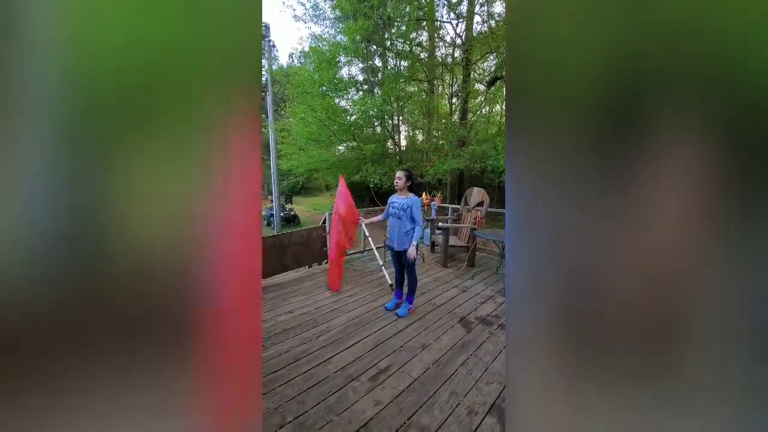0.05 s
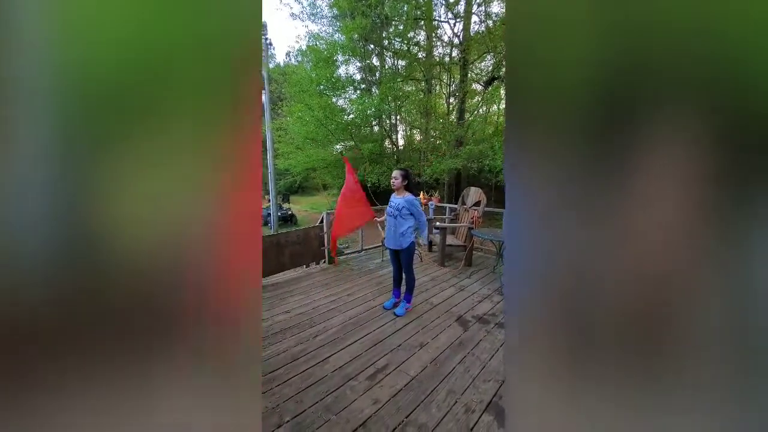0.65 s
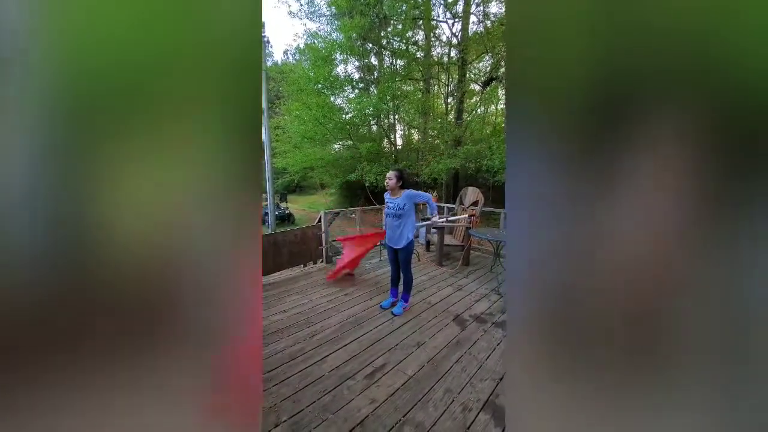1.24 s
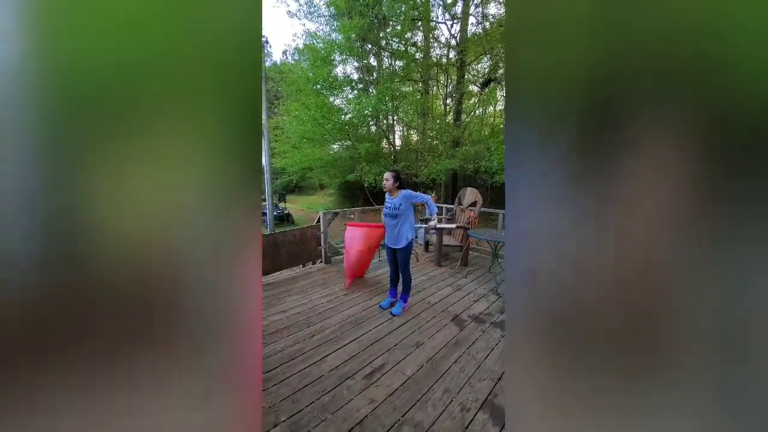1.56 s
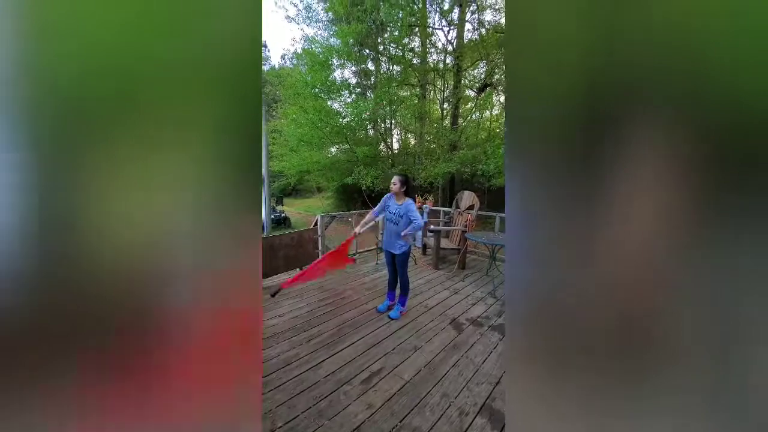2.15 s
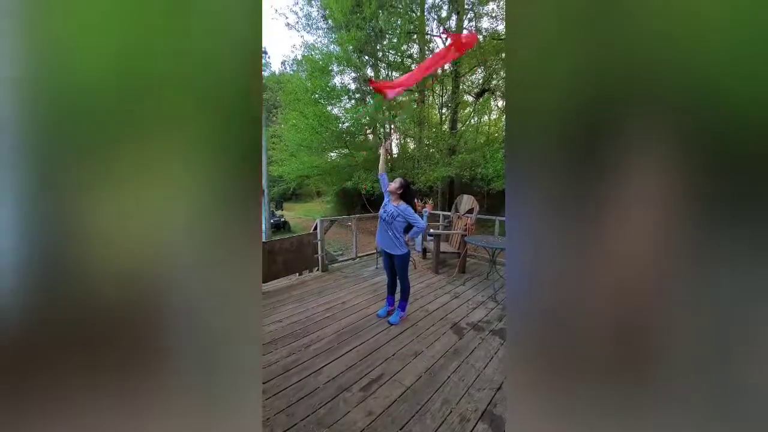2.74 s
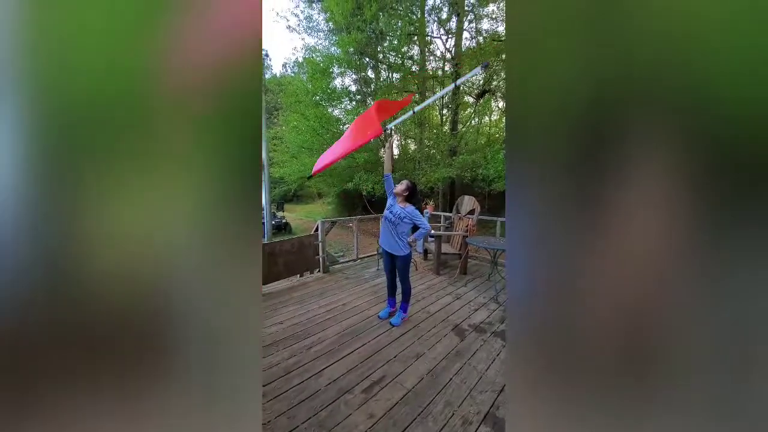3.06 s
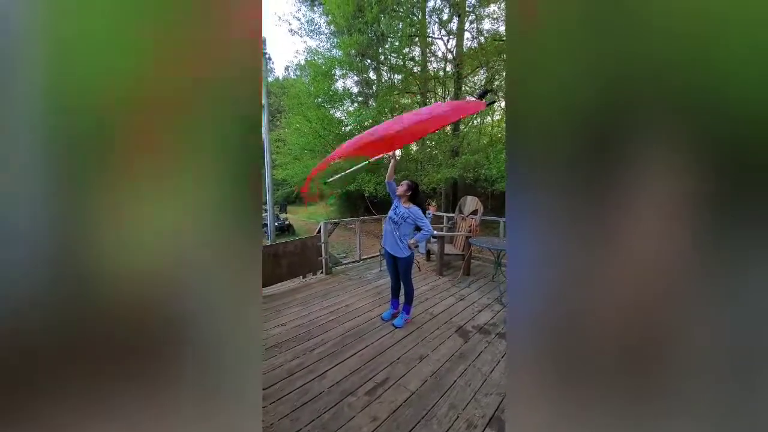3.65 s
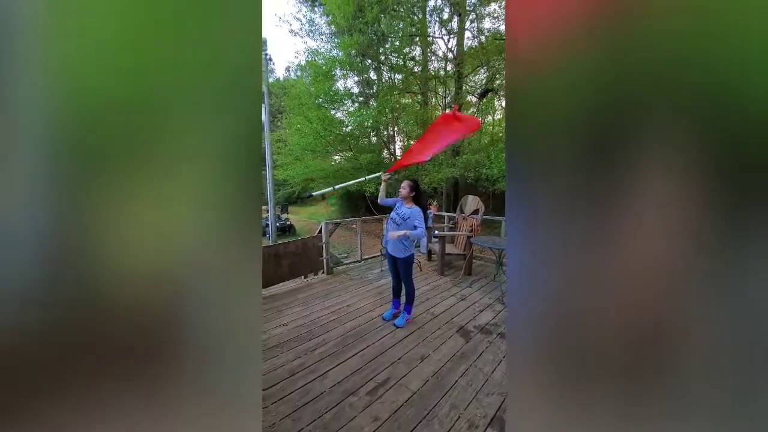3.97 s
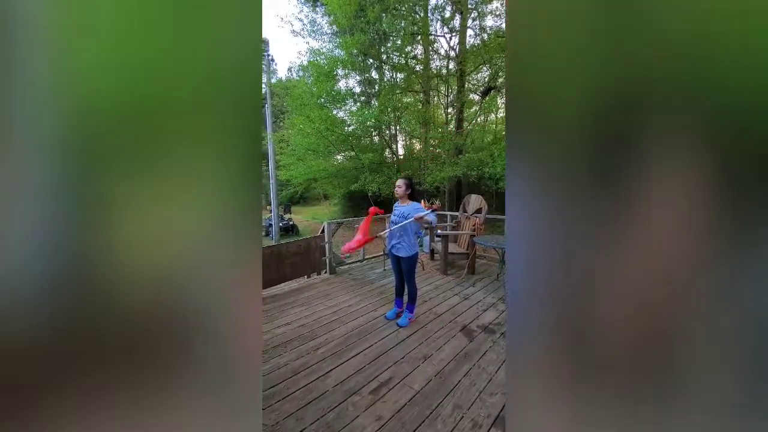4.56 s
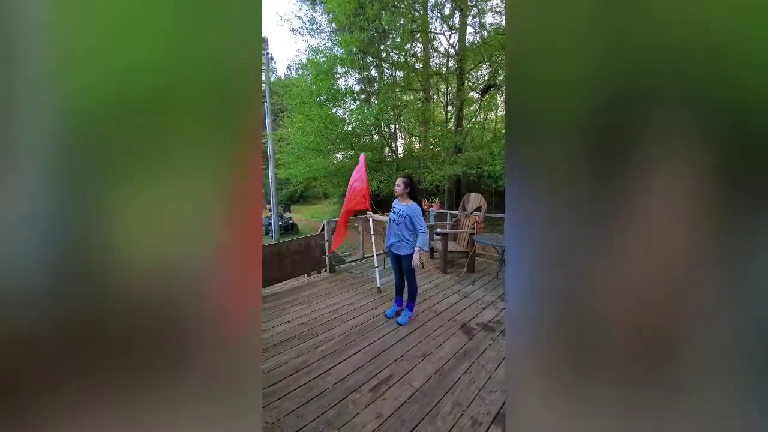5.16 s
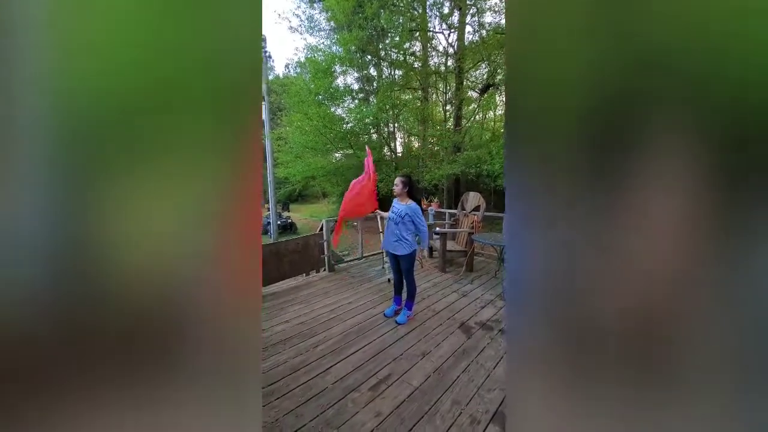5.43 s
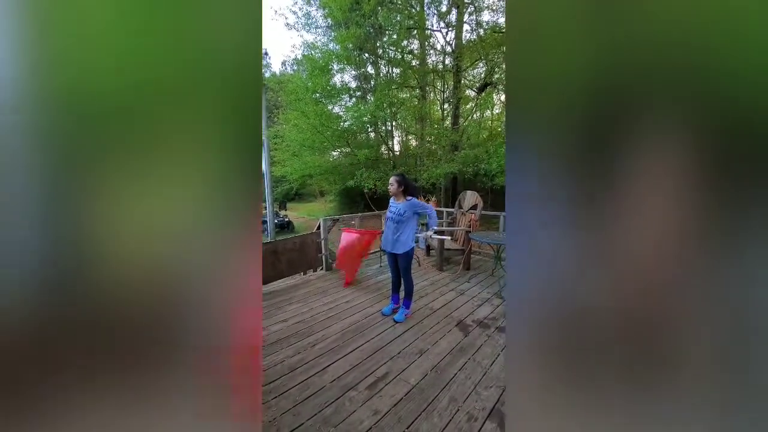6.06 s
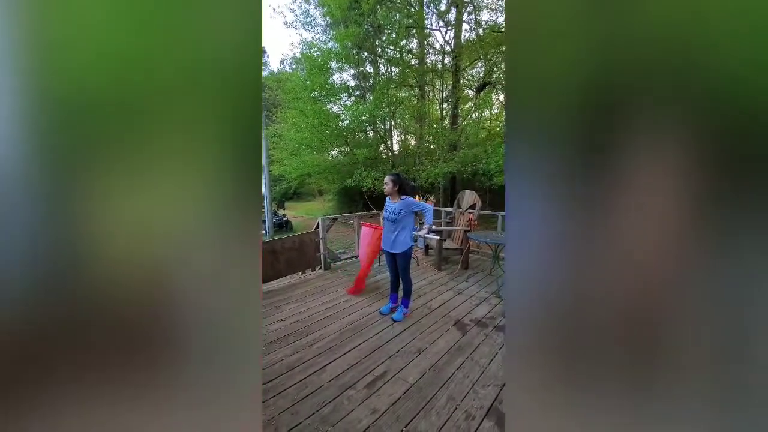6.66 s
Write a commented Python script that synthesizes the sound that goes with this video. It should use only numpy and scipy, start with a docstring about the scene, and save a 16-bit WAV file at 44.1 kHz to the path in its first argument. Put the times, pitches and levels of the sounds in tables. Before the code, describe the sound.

A flag pole clacks into catching hands, twice sharply, over distant traffic rumble, chirping birds and soft cloth swishes.

```python
"""A flag is spun, tossed and caught on a wooden deck at the edge of a wood.
From the start, far traffic rumbles and slowly moves off while leaves hiss faintly.
A songbird whistles a rising note, the cloth swishes, the pole clacks in the hands, and a thin,
very high whistle follows. After two seconds the cloth flaps twice. Then comes a run of falling
chirps, thrown back by the trees, with the two loudest catches near 4.3 and 5.9 seconds."""
import sys
import numpy as np
from scipy import signal
from scipy.fft import irfft
from scipy.io import wavfile
from scipy.ndimage import uniform_filter1d

SR = 44100
rng = np.random.default_rng(int(sys.argv[2]) if len(sys.argv) > 2 else 0)


def wrap_up_sound(samples):
    """Save the sound to the file named by the first command line argument, as 16-bit audio."""
    columns = np.atleast_2d(samples).T
    # keep every value between -1 and 1, then stretch to whole-number steps
    tamed = np.clip(columns, -1, 1)
    steps = np.round(tamed * 32767).astype(np.int16)
    wavfile.write(sys.argv[1], SR, steps)


N = 299880
TIME = np.arange(N) / SR


def amp(db):
    """Turns decibels into a number to multiply a sound by."""
    return 10 ** (np.asarray(db) / 20)


def unit(x):
    """Scales a signal so that its average size (rms) is 1."""
    return x / np.sqrt(np.mean(x ** 2) + 1e-20)


def read(points, hz):
    """Reads between the rows of a table, giving every octave equal room."""
    f, value = np.transpose(points)
    return np.interp(np.log(hz + 1), np.log(f + 1), value)


def add(mix, s, sound):
    """Mixes a sound in, starting at s seconds."""
    part = mix[..., max(round(s * SR), 0):][..., :sound.shape[-1]]
    part += sound[..., :part.shape[-1]]


def drift(n, size):
    """A smooth random wobble; a larger size makes it slower."""
    return unit(uniform_filter1d(uniform_filter1d(rng.standard_normal(n), size), size))


def causal(db, size=2048):
    """The shortest click that has the given spectrum, with energy 1."""
    log_gain = np.log(amp(np.r_[db, db[-2:0:-1]]))
    taps = irfft(np.exp(np.conj(signal.hilbert(log_gain)))[:size // 2 + 1])
    return taps / np.linalg.norm(taps)


def diffuse(spectrum):
    """Noise from all around: left and right are alike in the bass, unrelated in the treble."""
    # how alike the two sides are: f/Hz, likeness (1 = the same)
    likeness = [(60, 1), (130, 0.99), (290, 0.96), (640, 0.68), (1410, -0.055), (3100, -0.072),
                (6820, -0.023), (15000, -0.074)]
    # how much louder the left side is: f/Hz, level/dB
    balance = [(60, -0.4), (110, -1.0), (200, -0.5), (380, -2), (700, -2), (1290, 0.5), (2380, -4),
               (4400, 1.5), (8120, -1.5), (15000, -0.5)]
    hz = np.fft.rfftfreq(N, 1 / SR)
    left, other = np.exp(2j * np.pi * rng.random((2, len(hz))))
    same = np.clip(read(likeness, hz), -1, 1)
    right = same * left + np.sqrt(1 - same ** 2) * other
    level_db = read(spectrum, hz) + np.outer([.5, -.5], read(balance, hz))
    noise = irfft(np.array([left, right]) * amp(level_db), N)
    return noise / np.std(noise.mean(0))


def receding(start_db, fall_db, fade_s):
    """Volume of a sound that moves off: it falls fastest at first, then settles."""
    return amp(start_db - fall_db * (1 - np.exp(-TIME / fade_s)))


def traffic(drone_db=1.5, steadiness=0.19, dulling=0.94, sizzle_hz=3800, wander_db=0.46):
    """Engines throb and drone under the roar of tyres on a far road."""
    # tone of the deep rumble, the drone and the tyre roar: f/Hz, level/dB
    rumble_tone = [(15, -30), (30, -16), (42, -13), (50, -9), (55, -1.5), (64, 0), (73, 1.5), (86, 2),
                   (104, -9.5), (117, -10), (137, -16.5), (175, -17.5), (260, -29.5), (500, -81)]
    drone_tone = [(100, -6), (180, -12.5), (235, 1), (290, -4.5), (370, -3), (490, -2.5), (620, -14),
                  (1000, -44)]
    roar_tone = [(150, -27), (400, -8.5), (620, -4), (740, 0.5), (1050, 0.5), (1400, -0.5), (1850, -2.5),
                 (2900, -7.5), (3800, -17.5), (5000, -23.5), (6600, -24.5), (8000, -35.5), (16000, -46.5)]
    # how each fades with distance: starting level/dB, final drop/dB, fade time/s
    rumble_fade = (-30.5, 8.25, 1.9)
    drone_fade = (-44.5, 37.6, 14.4)
    roar_fade = (-40.5, 5.24, 4.28)
    engines = diffuse(rumble_tone)
    swell = uniform_filter1d(engines.mean(0) ** 2, size=5000)
    engines = engines / swell ** (steadiness / 2)  # engines run more evenly than plain noise
    tyres, nearness = diffuse(roar_tone), receding(*roar_fade)
    sizzle = signal.sosfiltfilt(signal.butter(2, sizzle_hz, "high", fs=SR, output="sos"), tyres)
    tyres = tyres + sizzle * (unit(nearness) ** dulling - 1)  # treble fades faster with distance
    drone = amp(drone_db) * receding(*drone_fade) * diffuse(drone_tone)
    waver = amp(wander_db * drift(N, size=5000))  # moving air makes far sound waver
    return receding(*rumble_fade) * engines + (drone + nearness * tyres) * waver


def leaves(level_db=-73):
    """Leaves give a faint, steady hiss."""
    # tone of the hiss: f/Hz, level/dB
    hiss_tone = [(2500, -23), (4000, -13), (6500, -7), (8200, -7), (10300, -4), (11900, -14.5),
                 (14400, -6.5), (15800, -13.5)]
    return amp(level_db) * diffuse(hiss_tone)


def rising_note(start, length, db, first_hz, last_hz, bend=1.2):
    """Path (t/s, f/Hz, level/dB) of a note that swells quickly and fades as it climbs."""
    progress = np.linspace(0, 1, 41)
    hz = last_hz + (first_hz - last_hz) * (1 - progress) ** bend  # the climb eases off
    swell_db = np.interp(progress, [0, 0.3, 1], [-3.5, 0, -12.5])
    return np.c_[start + length * progress, hz, db + swell_db]


def arched_note(start, length, db, top_hz, pitch_drop=.11, ends_db=-14):
    """Path (t/s, f/Hz, level/dB) of a note that rises and falls, loudest at the top."""
    progress = np.linspace(0, 1, 41)
    sag = (2 * progress - 1) ** 2
    return np.c_[start + length * progress, top_hz * (1 - pitch_drop * sag), db + ends_db * sag]


def whistle(path, waver, overtone_db=-24, beak_hz=3970, beak_width_hz=170):
    """Start time and sound of a gliding, wavering tone; faint overtones escape near one pitch."""
    s, hz, db = np.transpose(path)
    t = np.arange(s[0], s[-1], 1 / SR)
    pitch = np.interp(t, s, hz) * (1 + waver * drift(len(t), size=200))
    angle = 2 * np.pi * np.cumsum(pitch) / SR
    leak = amp(overtone_db) * np.exp(-((pitch - beak_hz) / beak_width_hz) ** 2)
    tone = np.sin(angle) + leak * (np.sin(2 * angle) + np.sin(3 * angle))
    return s[0], amp(np.interp(t, s, db)) * tone * signal.windows.tukey(len(t), .1)


def birds(direct_db=-4, near_db=-4, echo_db=0.5, chirp_db=-3, thin_db=-5, pan_db=-1, flutter_db=3):
    """Whistled calls come from the trees, both directly and as strong echoes."""
    # rising notes: t/s, length/s, level/dB, first f/Hz, last f/Hz
    rising_notes = [(0.152, 0.21, -50, 3280, 4460), (2.335, .29, -48, 3370, 4400),
                    (2.603, .17, -61, 4820, 5050), (5.923, .22, -46, 3477, 4740)]
    # thin, very high notes: t/s, length/s, level/dB, top f/Hz
    thin_notes = [(.42, 0.28, -64, 11250), (4.88, 0.32, -65, 10800), (5.2, .46, -70, 11700),
                  (6.45, 0.23, -69, 10400)]
    # falling chirps: t/s, level/dB, top f/Hz
    chirp_notes = [(3.584, -54, 4130), (3.907, -51.5, 4000), (4.212, -51, 3900), (4.499, -51.5, 3940),
                   (4.773, -49.5, 3920), (5.044, -47, 3825), (5.313, -49.5, 3860), (5.585, -48, 3850),
                   (6.124, -49, 3850), (6.406, -49.5, 3880)]
    # path of one chirp: t/s, share of the top pitch, level/dB
    chirp_shape = [(-.012, 1, -20), (0, 0.97, -4.5), (.012, .94, -3), (.020, .78, 6), (.028, .63, 8.5),
                   (.035, 0.682, -22)]
    rising, chirps, thin = np.zeros((3, N))
    for note in rising_notes:
        add(rising, *whistle(rising_note(*note), waver=0.0128, overtone_db=-21))
    for s, db, hz in chirp_notes:
        path = np.array(chirp_shape) * [1, hz, 1] + [s, 0, db]
        add(chirps, *whistle(path, waver=0.02, overtone_db=-25))
    for note in thin_notes:
        add(thin, *whistle(arched_note(*note), waver=.018))
    twitter = np.minimum(abs(drift(N, size=900)), 2)  # the thin whistle comes in scraps
    calls = rising * amp(flutter_db * drift(N, size=300)) + amp(thin_db) * thin * twitter
    direct = amp(direct_db) * calls + amp(chirp_db) * chirps
    near_echoes = amp(near_db) * branches(calls + chirps)
    far_echoes = woods(amp(echo_db) * calls + chirps, rise_s=0.014)
    return (direct + near_echoes + far_echoes) * amp([[pan_db / 2], [-pan_db / 2]])


def branches(x, count=24, spread_s=.014):
    """A call takes many short paths through the branches, which blur it and break it up."""
    echoes = np.zeros((2, SR // 8))
    for side in echoes:
        delays = np.minimum(rng.exponential(spread_s, count) * SR, len(side) - 1).astype(int)
        side[delays] = rng.choice([-1., 1.], count) / np.sqrt(count)
    return signal.fftconvolve(x[None], echoes, axes=1)[:, :N]


def woods(x, rise_s):
    """Echoes from trunks and leaves swell in, then die away; the middle pitches last longest."""
    # how long the wood echoes: f/Hz, time to fade by 60 dB/s
    echo_times = [(200, 0.2), (3000, 0.69), (5000, 0.58), (8000, 0.6), (15000, 0.49)]
    hz, t, bands = signal.stft(rng.standard_normal((2, SR)), SR, nperseg=256)
    bands = bands * amp(-60 * t / read(echo_times, hz)[:, None]) * (1 - np.exp(-t / rise_s))
    tail = signal.istft(bands, SR, nperseg=256)[1]
    return signal.fftconvolve(np.atleast_2d(x), tail / np.linalg.norm(tail[0]), axes=1)[:, :N]


def flag(rise_s=0.0011, crinkle_db=3):
    """The cloth swishes with a fine crinkle and gives soft, low flaps."""
    # cloth sweeping through the air: t/s, level/dB, fade time/s
    swishes = [(.315, -53, .015), (2.342, -51, 0.15), (3.172, -44, 0.028)]
    # tone of a swish: f/Hz, level/dB
    cloth_tone = [(700, -10), (1500, -1), (3500, 6), (6500, -10), (8000, -8), (11000, -16), (16000, -20)]
    # cloth filling with air: t/s, level/dB, f/Hz, half length/s
    flaps = [(2.191, -25, 140, 0.0027), (2.356, -24, 178, 0.0032)]
    volume, t = np.zeros((2, N)), np.arange(SR // 2) / SR
    for s, db, fade_s in swishes:
        add(volume, s, amp(db) * (1 - np.exp(-t / rise_s)) * np.exp(-t / fade_s))
    out = volume * diffuse(cloth_tone) * amp(crinkle_db * drift(N, size=100))
    for s, db, hz, half_s in flaps:
        out += amp(db) * np.exp(-((TIME - s) / half_s) ** 2) * np.cos(2 * np.pi * hz * (TIME - s))
    return out


def contacts(count=3, firm_s=0.002, firm_db=-22, doubling_db=30):
    """The pole hits the hand and bounces, each time sooner, duller and usually softer."""
    # pole meeting the hands: t/s, level/dB, brightness/(dB per octave),
    # grip (0 = flat palm, 1 = fingers), time to first bounce/s, loss at first bounce/dB
    clacks = [(.376, -43.5, -.5, 0.46, 0.0072, 12), (1.463, -36, -3, .1, .006, 12),
              (2.219, -36.5, -5, .1, 0.0055, 0), (2.33, -36, -3, .45, .014, 5),
              (3.135, -36, -3, .7, 0.024, -1), (3.166, -30.5, -1.5, 0.17, 0.0085, 14),
              (4.299, -18, -1, .15, .0117, -1), (4.3027, -16.5, 5, 0.55, 0.015, 8),
              (4.625, -49, 0, .9, .006, 15), (5.873, -19, 2, .58, 0.0089, 8),
              (5.948, -40, -2, 0.4, 0.0049, 15)]
    for s, db, bright, grip, gap_s, loss_db in clacks:
        for _ in range(count):
            softness_db = firm_db - max(db, 2 * firm_db)
            contact_s = firm_s * 2 ** (softness_db / doubling_db)  # softer hits last longer
            yield s, db, bright, contact_s, grip
            s, db, bright = s + gap_s, db - loss_db, bright - 0.5
            gap_s *= .45
            loss_db += 10  # the hand closes


def tilt_db(bright, hz):
    """Tips the treble up (bright above 0) or down (below 0), pivoting at 5000 Hz."""
    return bright * np.log2(np.maximum(hz, 1000) / 5000)


def pole(scatter_db=-15, scatter_s=0.012, ring_db=-22, echo_db=-16, pan_db=-2):
    """Each hit is a short crack, scattered by boards and railing; the tube rings on unevenly."""
    # tone of a clack on the palm and on the fingers: f/Hz, level/dB
    palm = [(200, -11), (1300, -17), (1750, -9.5), (2250, 11.5), (2700, -3.5), (3150, -4), (4400, -4.5),
            (5300, -4.5), (6500, -10.5), (7700, -29), (10300, -12), (12000, -23), (14200, -19),
            (16000, -36)]
    fingers = [(200, -18), (1400, -16), (1800, 12), (2200, -10), (3000, 2), (4400, -12.5), (5400, -11.5),
               (6500, 11), (7800, -13.5), (10300, -8), (12000, -18), (14200, -23), (16000, -37)]
    # the tube's ring, muffled by the hand: f/Hz, level/dB, time to fade by 60 dB/s
    ring_tones = [(2320, 2, 0.069), (3210, 7, 0.096), (5350, 2.5, 0.076), (6290, -2, 0.29),
                  (6500, -7, 0.19), (10300, -17, 0.27)]
    t, hz = np.arange(SR // 3) / SR, np.fft.rfftfreq(2048, 1 / SR)
    scatter = amp(scatter_db) * 2 * (t / scatter_s) * np.exp(1 - 2 * t / scatter_s)
    out = np.zeros((2, N))
    for s, db, bright, contact_s, grip in contacts():
        colour = causal((1 - grip) * read(palm, hz) + grip * read(fingers, hz) + tilt_db(bright, hz))
        crack = rng.choice([-1., 1.], (2, len(t))) * (np.exp(-t / contact_s) + scatter)
        add(out, s, amp(db) * signal.fftconvolve(crack, colour[None], axes=1))
        for f, tone_db, fade_s in ring_tones:
            volume = amp(db + ring_db + tone_db + tilt_db(bright, f) - 60 * t / fade_s)
            # the hand presses and lets go
            flutter = np.array([drift(len(t), size=200), drift(len(t), size=200)])
            add(out, s, volume * flutter * np.sin(2 * np.pi * f * t))
    echoes = amp(echo_db) * woods(out, rise_s=0.0038)
    return (out + echoes) * amp([[pan_db / 2], [-pan_db / 2]])


def scene():
    """Everything heard from the deck."""
    return traffic() + leaves() + pole() + flag() + birds()


def record(dry, cutoff_hz=15750):
    """Takes away the very highest treble."""
    low_pass = signal.firwin(511, cutoff_hz, window=("kaiser", 9), fs=SR)
    return signal.oaconvolve(dry, low_pass[None], "same")


dry = scene()
out = record(dry)
wrap_up_sound(out)
```